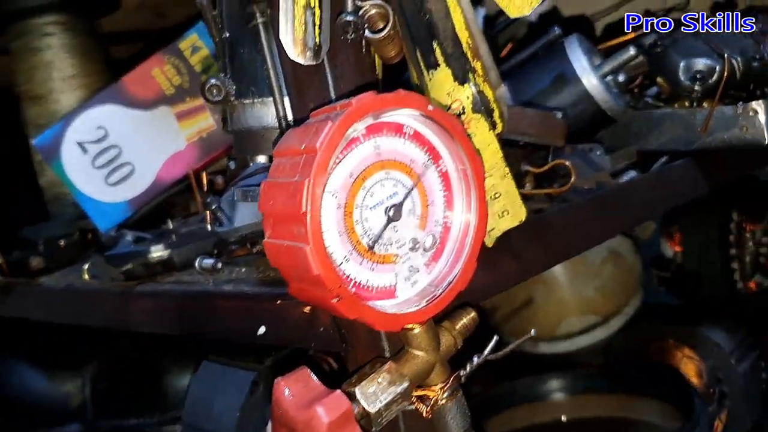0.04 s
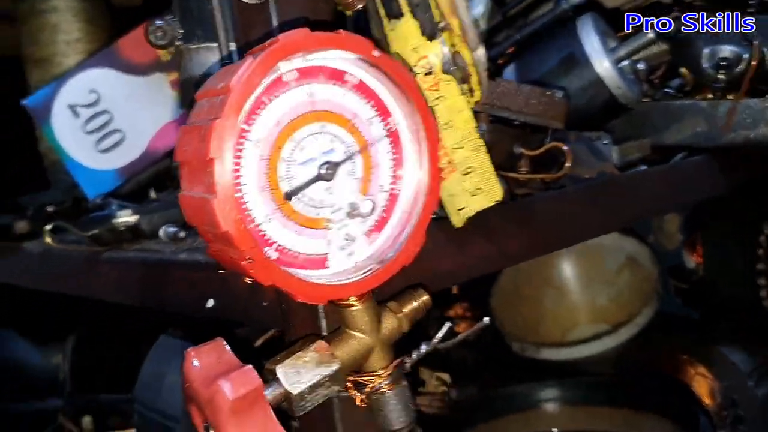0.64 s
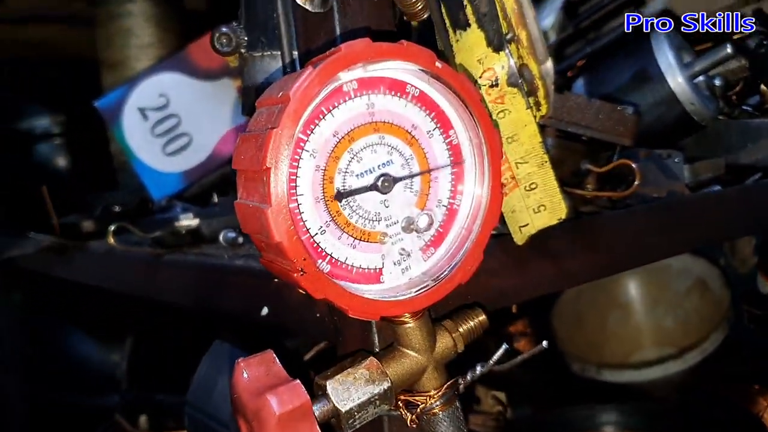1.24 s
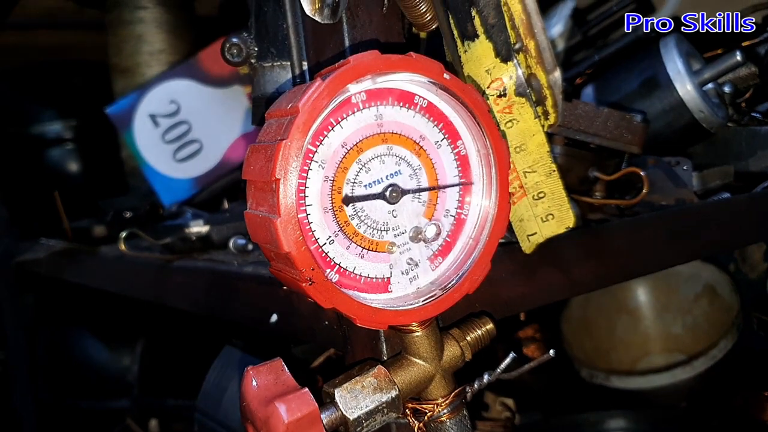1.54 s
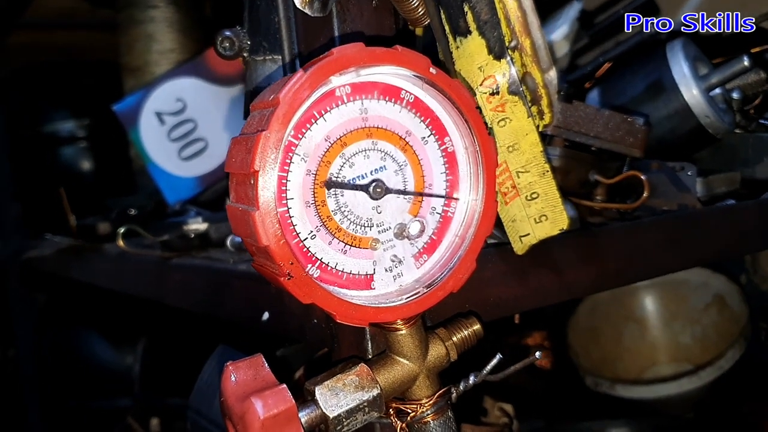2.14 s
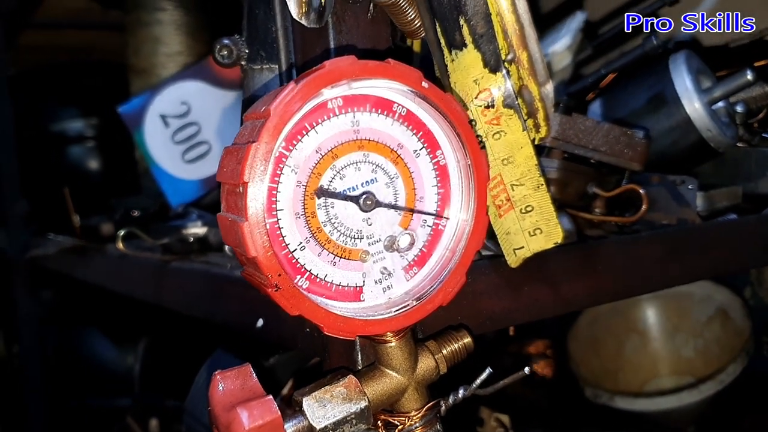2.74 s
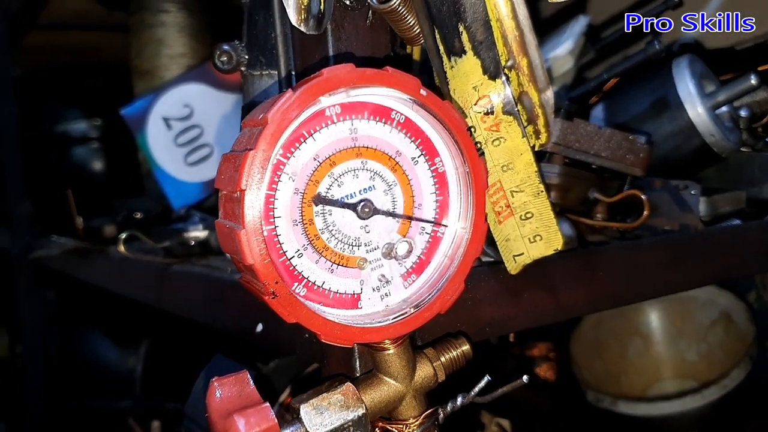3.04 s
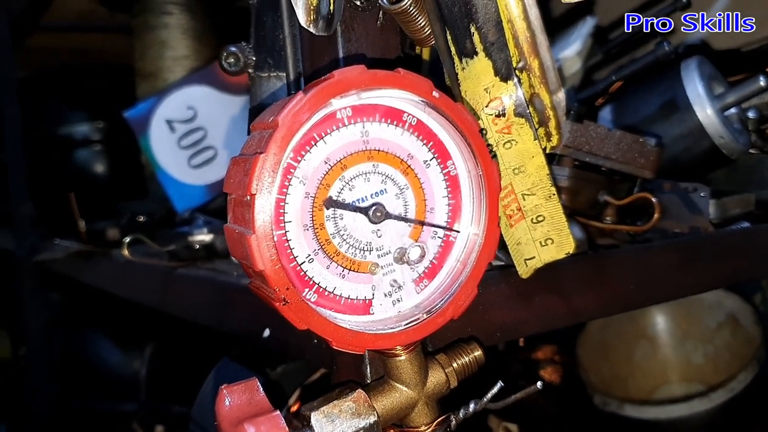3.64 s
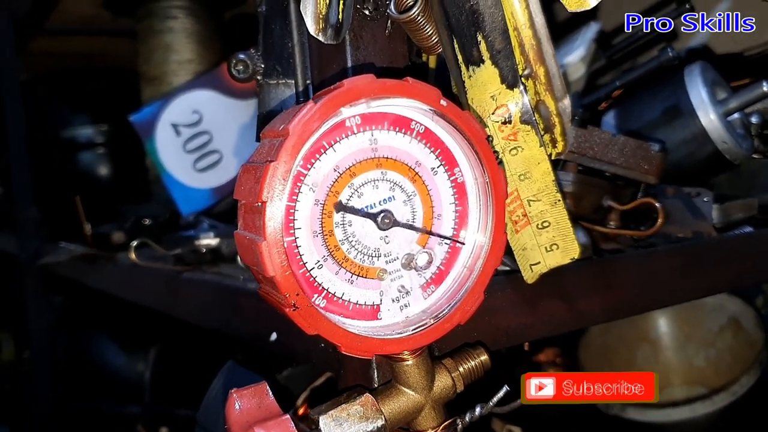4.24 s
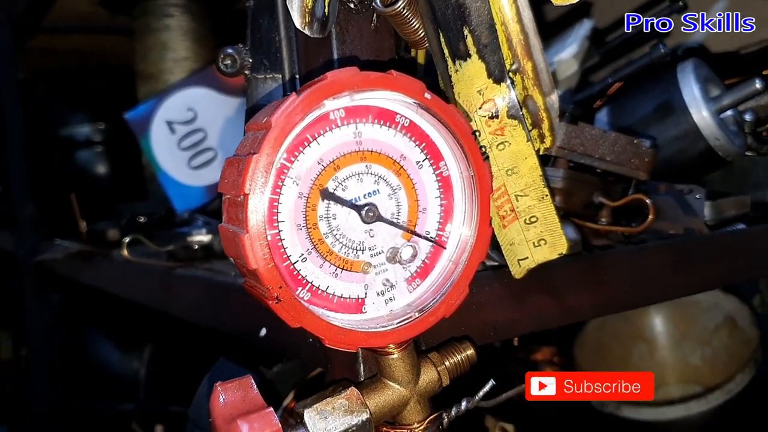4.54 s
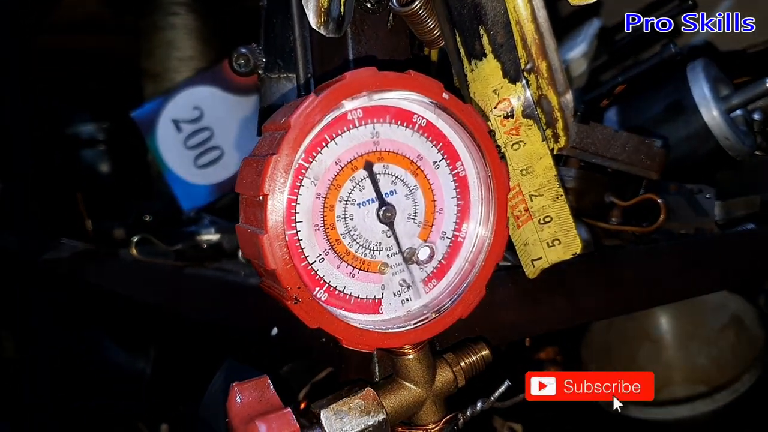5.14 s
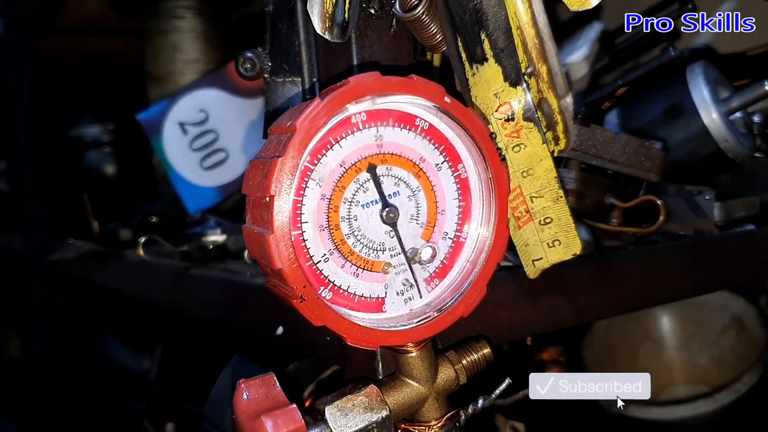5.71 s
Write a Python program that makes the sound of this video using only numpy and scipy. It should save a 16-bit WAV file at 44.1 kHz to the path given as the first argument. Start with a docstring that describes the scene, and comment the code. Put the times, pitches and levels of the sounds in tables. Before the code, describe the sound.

Wind rumbles on the microphone over the steady, rattling hum of a small fridge compressor running in a workshop.

```python
"""A low, rattling hum, buffeted by wind: a small refrigerator compressor runs on a workshop bench.
Its shaft turns 48 times a second and forces the shell to vibrate, most strongly at twice that rate.
Each stroke knocks, rattles the shell, snaps a valve reed and lets out a puff of gas. The rattle grows
as the pressure builds, and now and then slackens for a moment. A gusty draught, as from a fan,
drives turbulence over the two ports of a nearby microphone, mostly the right one."""
import sys
import numpy as np
from scipy import signal
from scipy.fft import rfft, irfft
from scipy.io import wavfile
from scipy.ndimage import uniform_filter1d, minimum_filter1d

SR = 44100
rng = np.random.default_rng(int(sys.argv[2]) if len(sys.argv) > 2 else 0)


def unload_audio(sound):
    """Save the sound as a 16-bit wav file, at the path given as the first command line argument."""
    columns = np.transpose(np.atleast_2d(sound))
    # keep every value between -1 and 1, then stretch to whole-number steps
    steps = np.round(np.clip(columns, -1, 1) * 32767)
    wavfile.write(sys.argv[1], SR, steps.astype(np.int16))


N = 254456
TIME = np.arange(N) / SR
FREQS = np.maximum(np.fft.rfftfreq(N, 1 / SR), 1)


def undb(db):
    """Amplitude ratio of a level in decibels."""
    return 10 ** (np.asarray(db) / 20)


def unit(x):
    """Normalisation to an rms of 1."""
    return x / np.sqrt(np.mean(x ** 2))


def curve(table):
    """Linear interpolation of (seconds, value) rows at every sample."""
    return np.interp(TIME, *np.transpose(table))


def colour(x, spectrum):
    """Spectral shaping by (Hz, dB) rows, falling steeply beyond the first and the last."""
    hz, db = np.transpose(spectrum)
    skirts = np.minimum(np.minimum(FREQS / hz[0], hz[-1] / FREQS), 1) ** 4
    return irfft(rfft(x) * skirts * undb(np.interp(np.log(FREQS), np.log(hz), db)), N)


def noise(spectrum, envelope=1):
    """Amplitude-modulated white noise, shaped to a spectrum, with an rms of 1."""
    return unit(colour(envelope * rng.standard_normal(N), spectrum))


def wander(rate_hz):
    """Low-pass noise: a smooth random fluctuation with an rms of 1."""
    return unit(irfft(rfft(rng.standard_normal(N)) * np.exp(-(FREQS / rate_hz) ** 2), N))


def pulses(turn, start, decay, floor):
    """Periodic envelope: a rise and exponential decay above a floor; start and decay are in turns."""
    age = (turn - start) % 1 / decay
    return unit(floor + np.e * age * np.exp(-age))


# The shell's harmonics. Each row: multiple of the shaft rate, left and right relative levels in dB.
SHELL_HARMONICS = [(1, -51, -39), (2, -32, -18.5), (3, -58, -39), (4, -51.5, -50), (5, -70, -48.5),
                   (6, -69, -74), (7, -41, -43), (8, -46.5, -52.5), (9, -75, -97), (10, -49, -59.5),
                   (11, -54.5, -58), (12, -51.5, -52.5), (13, -46.5, -53), (14, -54.5, -63.5),
                   (15, -58, -84), (16, -45.5, -52.5), (17, -57, -63.5), (20, -58, -58.5)]

def hum(turn, load_db, waver_db, waver_rad):
    """Forced vibration at harmonics of the shaft rate; higher ones waver more and follow the load more."""
    out = np.zeros((2, N))
    for order, left_db, right_db in SHELL_HARMONICS:
        sensitivity = np.sqrt(order / len(SHELL_HARMONICS))
        phase = 2 * np.pi * (order * turn + rng.random()) + waver_rad * sensitivity * wander(7.6)
        swell = undb(sensitivity * (load_db + waver_db * wander(5.9)))
        out += undb([[left_db], [right_db]]) * np.sqrt(2) * np.sin(phase) * swell
    return out


# The shell's resonances. Each row: frequency in Hz, bandwidth in Hz, relative peak level in dB.
SHELL_MODES = [(1245, 40, -8), (1605, 50, 0), (1690, 50, 0), (1824, 25, -1), (1925, 30, -5), (2055, 70, -1),
               (2208, 25, 0), (2352, 25, -3), (2484, 35, 6), (2630, 45, 1), (2712, 45, 0)]
# How well the stiff shell radiates. Each row: frequency in Hz, relative gain in dB.
SHELL_RADIATION = [(800, -2.5), (2740, 1), (2850, 3), (3500, 7), (5500, 0)]

def shell_ring(blows, linger):
    """Modal resonance: a linger of 1 gives minimum phase, the promptest response; more prolongs it."""
    power = sum(undb(db) ** 2 / (1 + (hz / width * (FREQS / hz - hz / FREQS)) ** 2)
                for hz, width, db in SHELL_MODES)
    gain = np.sqrt(power)
    cepstrum = irfft(np.log(gain), N)
    cepstrum[1:N // 2] *= 2  # folding onto positive time yields the minimum phase
    cepstrum[N // 2 + 1:] = 0
    response = gain * np.exp(1j * linger * rfft(cepstrum).imag)
    return unit(colour(irfft(rfft(blows) * response, N), SHELL_RADIATION))


def knocks(turn, start, scatter_db, jitter_s):
    """Impulse excitation: the piston knocks on the shell once a turn, never quite alike."""
    count = int(turn[-1])
    timing, strength = rng.standard_normal((count, 2)).T
    onsets_s = np.interp(np.arange(count) + start, turn, TIME) + jitter_s * timing
    blows = np.zeros(N)
    blows[np.clip((onsets_s * SR).astype(int), 0, N - 1)] = undb(scatter_db * strength)
    return ports(shell_ring(blows, linger=1.65), reflected=0, coherence=0.83)


# Spectrum of the loose shell and pipes. Each row: frequency in Hz, relative level in dB.
CLATTER_SPECTRUM = [(500, -7.5), (900, 2), (1400, -2), (1650, -2), (2100, 1), (2650, -2), (2950, -2.5),
                    (3400, -5), (3900, -12.5), (5000, -12.5)]

def clatter(turn, scatter_db):
    """Contact noise: loose parts buzz, hardest after the knock and again as the valve slaps shut."""
    knock = pulses(turn, start=0.616, decay=0.0091, floor=1)
    valve = pulses(turn, start=0.85, decay=0.0061, floor=1)
    envelope = (knock + valve) * undb(scatter_db * wander(35))
    return ports(noise(CLATTER_SPECTRUM, envelope), noise(CLATTER_SPECTRUM, envelope), coherence=0.28)


# Spectrum of the valve reed's tick. Each row: frequency in Hz, relative level in dB.
REED_SPECTRUM = [(2900, 1.5), (3400, -0.5), (4200, -12.5), (4700, -6.5), (5400, -3.5), (6200, -17.5),
                 (7400, -17.5)]

def reed_ticks(turn, scatter_db):
    """A brief impact has a broad spectrum: the valve reed snaps once a turn with a bright click."""
    envelope = pulses(turn, start=0.705, decay=0.022, floor=0) * undb(scatter_db * wander(30))
    return ports(noise(REED_SPECTRUM, envelope), noise(REED_SPECTRUM, envelope), coherence=0.14)


# Spectrum of gas passing the valves. Each row: frequency in Hz, relative level in dB.
GAS_SPECTRUM = [(2500, -25), (3300, -9), (4200, 5), (4600, -14.5), (5400, 1), (6200, -8), (7400, -6),
                (8300, 3.5), (9200, 2.5), (10300, -0.5), (11500, -5), (15400, -7.5)]

def gas_hiss(turn, scatter_db):
    """Flow noise: the discharge valve lets out a puff just after the knock, over a steady stream."""
    puff = pulses(turn, start=0.635, decay=0.021, floor=0) * undb(scatter_db * wander(38))
    envelope = 1 + undb(-11) * puff
    return ports(noise(GAS_SPECTRUM, envelope), noise(GAS_SPECTRUM, envelope), coherence=0.27)


# Shadow at the right port, which faces away from the pump. Each row: frequency in Hz, gain in dB.
PORT_SHADOW = [(300, -33), (1650, -7.5), (2100, -5), (2600, -3.5), (3400, -9), (4300, -17), (5300, -16.5),
               (6300, -21), (8500, -33), (10000, -16), (11500, -19.5), (15400, -32)]

def ports(direct, reflected, coherence, left_lag_s=0.00013):
    """Acoustic shadowing: the left port gets the direct sound, the right a shaded mix with reflections."""
    right = colour(coherence * direct + np.sqrt(1 - coherence ** 2) * reflected, PORT_SHADOW)
    return np.array([np.interp(TIME - left_lag_s, TIME, direct), right])


# Lulls in the rattle. Each row: start in seconds, nominal depth in dB.
RATTLE_LULLS = [(0.12, 4), (0.47, 3), (0.9, 3.5), (1.68, 1), (2.1, 2), (2.56, 4.5), (3.4, 3), (4.37, 3),
                (4.66, 3), (5.12, 3), (5.52, 3)]

def slackening(fall_s, recover_s):
    """Relaxation: the rattle's drop in dB sets in quickly at each lull and fades more slowly."""
    drop_db = np.zeros(N)
    for start_s, depth_db in RATTLE_LULLS:
        age = np.maximum(TIME - start_s, 0)
        drop_db += depth_db * np.minimum(age / fall_s, 1) * np.exp(-(age / recover_s) ** 2)
    return drop_db


# Rotation of the shaft. Each row: time in seconds, speed in turns a second.
SHAFT_SPEED = [(0.0, 48.037), (1.0, 48.0), (2.0, 47.969), (3.0, 47.939), (3.8, 47.962), (4.5, 48.013),
               (5.77, 48.115)]
# Load on the pump as the pressure builds. Each row: time in seconds, relative rattle level in dB.
PUMP_LOAD = [(0.0, -39), (0.6, -37), (1.1, -39.5), (2.4, -38.5), (3.0, -36), (3.85, -33.5), (4.8, -34.5),
             (5.45, -34), (5.77, -36)]

def compressor():
    """Periodic forcing: the shaft times all layers, the load scales them. Returns sound and load in dB."""
    turn = np.cumsum(curve(SHAFT_SPEED)) / SR
    trend_db, lull_db = curve(PUMP_LOAD), slackening(fall_s=0.027, recover_s=0.16)
    rattle_db = trend_db - lull_db
    effort_db = rattle_db - rattle_db.mean()
    gas_db = -51 + (trend_db - trend_db.mean()) - 0.7 * lull_db
    load_db = 0.56 * effort_db
    pump = hum(turn, load_db - 0.8, waver_db=1.6, waver_rad=0.059)
    pump += undb(-41 + 0.84 * effort_db) * knocks(turn, start=0.595, scatter_db=0.1, jitter_s=0.000016)
    pump += undb(rattle_db - 4.5) * clatter(turn, scatter_db=0.63)
    pump += undb(rattle_db - 14.5) * reed_ticks(turn, scatter_db=0.3)
    pump += undb(gas_db) * gas_hiss(turn, scatter_db=3.0)
    return pump, load_db


# The draught between the big gusts. Each row: time in seconds, relative level in dB.
BREEZE_LEVEL = [(0.04, -25), (0.14, -35.5), (0.35, -26), (0.7, -26), (1.1, -20), (1.55, -18.5),
                (2.1, -22.5), (2.6, -23), (2.68, -37.5), (3.75, -34), (4.1, -25.5), (4.7, -20.5),
                (5.1, -22), (5.77, -24.5)]
# The big gusts. Each row: centre and length in seconds, relative rumble and flutter levels in dB, port.
BIG_GUSTS = [(0.227, 0.028, -17, -27.5, "right"), (0.382, 0.055, -15, -30.5, "right"),
             (0.491, 0.025, -8, -16, "right"), (0.558, 0.0082, -25, -13.5, "right"),
             (0.574, 0.035, -8.5, -18, "right"), (0.822, 0.065, -14, -22.5, "right"),
             (0.962, 0.029, -14, -13.5, "right"), (1.037, 0.069, -15, -21.5, "right"),
             (1.197, 0.036, -7.5, -22, "right"), (1.444, 0.053, -13.5, -19, "right"),
             (1.509, 0.026, -29, -28.5, "left"), (1.66, 0.031, -12, -14.5, "right"),
             (1.772, 0.065, -14, -26.5, "right"), (1.911, 0.068, -19, -25.5, "right"),
             (2.059, 0.076, -16.5, -20, "right"), (2.222, 0.082, -19.5, -20.5, "right"),
             (2.225, 0.05, -30, -25, "left"), (2.337, 0.035, -15, -25, "right"),
             (2.409, 0.015, -14, -31, "right"), (2.528, 0.077, -18, -23, "right"),
             (2.895, 0.026, -20.5, -48, "right"), (3.951, 0.048, -11, -21.5, "right"),
             (4.045, 0.027, -31, -27, "left"), (4.07, 0.072, -16, -25, "right"),
             (4.238, 0.036, -17.5, -27, "right"), (4.353, 0.053, -21.5, -24.5, "right"),
             (4.707, 0.089, -22, -27, "left"), (4.909, 0.026, -20, -19.5, "right"),
             (5.008, 0.031, -19, -25, "right"), (5.201, 0.04, -18.5, -23.5, "right"),
             (5.341, 0.052, -13, -27.5, "right"), (5.478, 0.019, -10, -17, "right"),
             (5.629, 0.066, -12, -15, "right")]

def draught(port, exposure_db, calm_db, breeze_flutter_db):
    """Incoherent sources add in power: breeze and gusts sum to a port's rumble and flutter powers."""
    swing_db = 5 * np.tanh(wander(12.5))
    breeze = undb(curve(BREEZE_LEVEL) + exposure_db + swing_db)
    rumble_power = undb(calm_db) ** 2 + breeze ** 2
    flutter_power = (undb(breeze_flutter_db) * breeze) ** 2
    half_width, lead, rise, fall = 0.54, 0.18, 0.35, 0.68  # shares of a gust's length
    for centre_s, length_s, rumble_db, flutter_db, side in BIG_GUSTS:
        if side == port:
            age = (TIME - centre_s) / length_s
            rumble_power += undb(rumble_db) ** 2 * np.exp(-(age / half_width) ** 2)
            front = age + lead  # the flutter comes with the gust's front and dies away more slowly
            width = np.where(front < 0, rise, fall)
            flutter_power += undb(flutter_db) ** 2 * np.exp(-(front / width) ** 2)
    return rumble_power, flutter_power


def eddies(spectrum, span_s):
    """Turbulent pressure: noise whose strength is evened out over spans longer than one eddy."""
    pressure = colour(rng.standard_normal(N), spectrum)
    size = int(span_s * SR)
    local_power = uniform_filter1d(uniform_filter1d(pressure ** 2, size), size)
    return unit(pressure / np.sqrt(local_power + 1e-18))


# Spectra of the large, small and finest eddies. Each row: frequency in Hz, relative level in dB.
LARGE_EDDIES = [(20, -39), (40, -3.5), (58, 4.5), (78, 3), (105, 2), (135, -7), (175, -7), (230, -16),
                (330, -37)]
SMALL_EDDIES = [(120, -11), (180, 3), (330, -4), (480, -9), (700, -18.5), (1000, -29.5), (1400, -44)]
FINEST_EDDIES = [(600, -1), (900, 3), (1200, -5.5), (1600, -15)]

def buffeting(rumble_power, flutter_power, rumble_db, flutter_db):
    """Turbulence at a port: large eddies rumble, small ones flutter and the finest rush."""
    rumble = np.sqrt(rumble_power) * eddies(LARGE_EDDIES, span_s=0.02)
    flutter = np.sqrt(flutter_power) * unit(eddies(SMALL_EDDIES, span_s=0.013) * undb(3.9 * wander(190)))
    # the rush grows with the square of the flutter, so hard gusts are brighter
    rush = flutter_power * unit(noise(FINEST_EDDIES) * undb(1.9 * wander(150)))
    return undb(rumble_db) * rumble + undb(flutter_db) * flutter + undb(-4) * rush


# Spectrum of the low workshop noise. Each row: frequency in Hz, relative level in dB.
ROOM_SPECTRUM = [(20, -12), (70, -1), (130, -16), (240, -6), (285, 4.5), (320, -1.5), (380, 2), (430, 3.5),
                 (520, -3), (640, -3.5), (850, -9.5), (1300, -10)]

def workshop(coherence):
    """Diffuse field: the machine's sound in the room is a low murmur, only partly alike at the ports."""
    left, independent = noise(ROOM_SPECTRUM), noise(ROOM_SPECTRUM)
    return np.array([left, coherence * left + np.sqrt(1 - coherence ** 2) * independent])


def scene():
    """Superposition of pump, draught and room at the two ports; the murmur follows the pump's load."""
    pump, load_db = compressor()
    left_powers = draught("left", exposure_db=-17.5, calm_db=-50, breeze_flutter_db=-3)
    left = buffeting(*left_powers, rumble_db=1, flutter_db=-1)
    right_powers = draught("right", exposure_db=-1, calm_db=-44, breeze_flutter_db=-9)
    right = buffeting(*right_powers, rumble_db=2.5, flutter_db=1.04)
    return pump + np.array([left, right]) + undb(load_db - 43.5) * workshop(coherence=0.31)


def record(dry):
    """Peak limiting turns both channels down on the hardest gusts; a low-pass filter cuts the top."""
    ceiling, window_samples, top_hz = 0.95, 881, 15600
    allowed = np.minimum(1, ceiling / (np.abs(dry).max(axis=0) + 1e-9))
    gain = uniform_filter1d(minimum_filter1d(allowed, window_samples), window_samples)
    return signal.sosfilt(signal.ellip(8, 0.2, 70, top_hz, fs=SR, output="sos"), dry * gain)


dry = scene()
out = record(dry)
unload_audio(out)
```